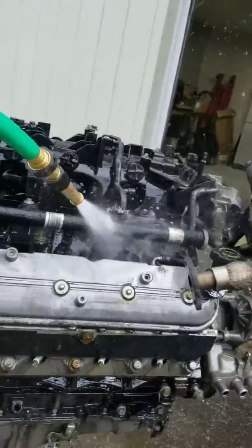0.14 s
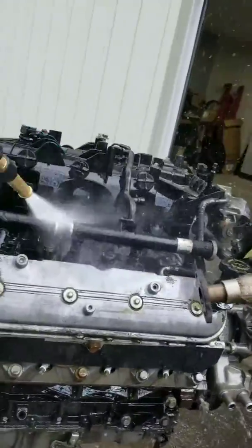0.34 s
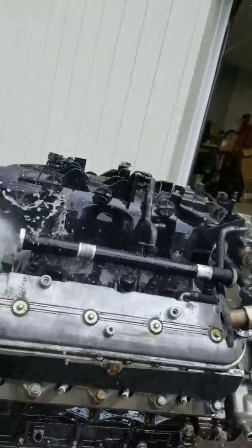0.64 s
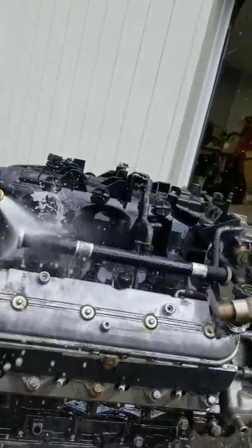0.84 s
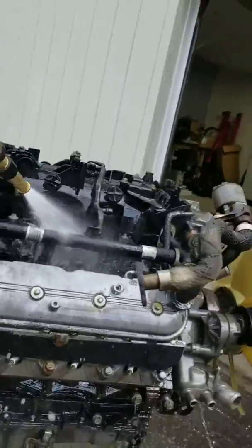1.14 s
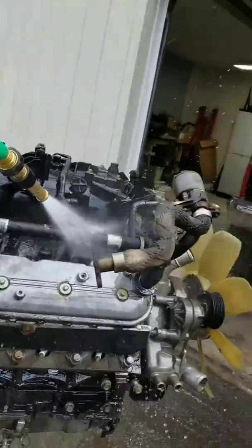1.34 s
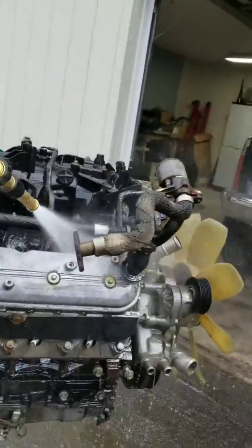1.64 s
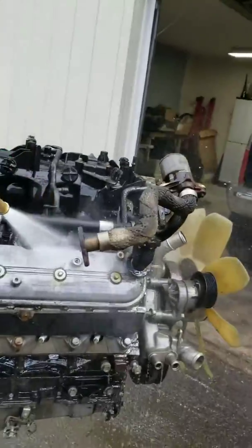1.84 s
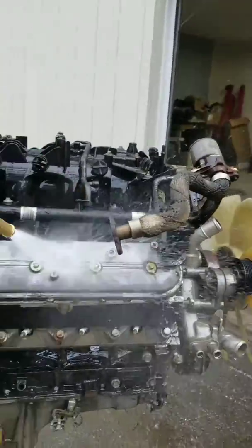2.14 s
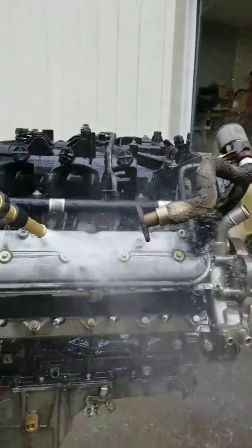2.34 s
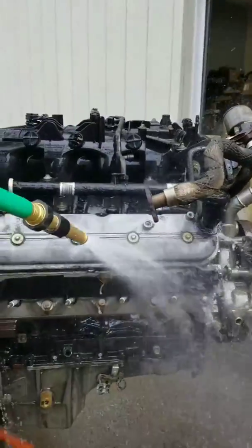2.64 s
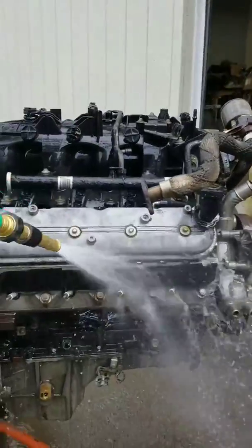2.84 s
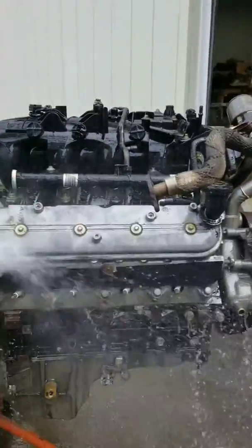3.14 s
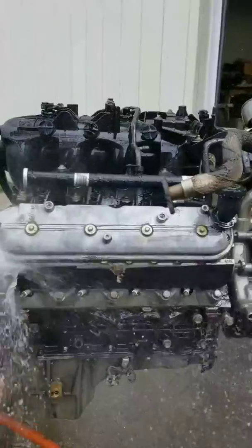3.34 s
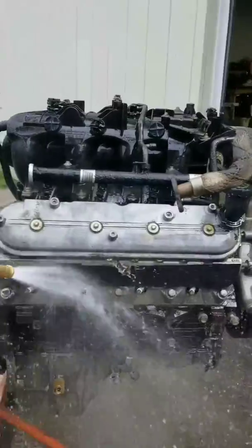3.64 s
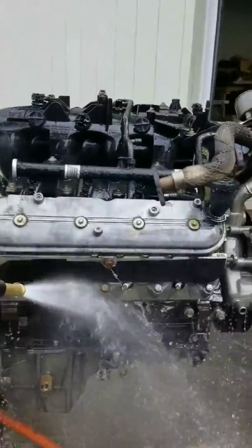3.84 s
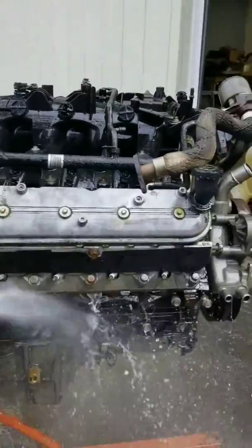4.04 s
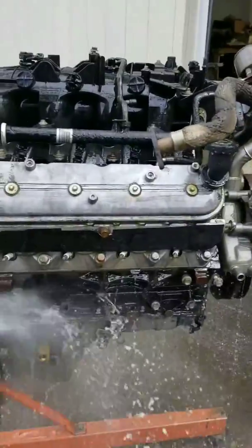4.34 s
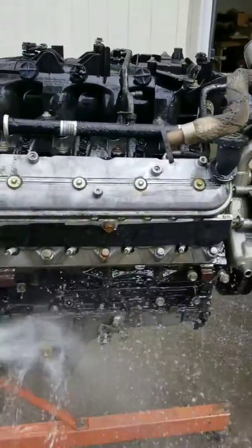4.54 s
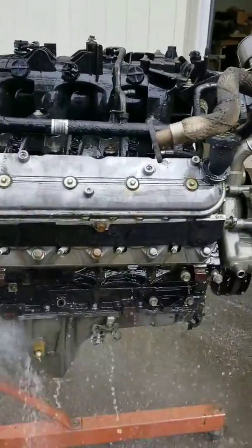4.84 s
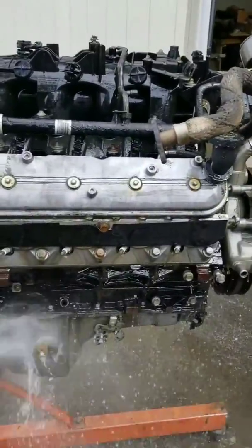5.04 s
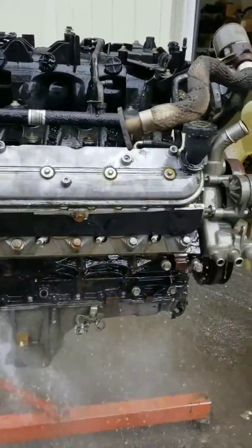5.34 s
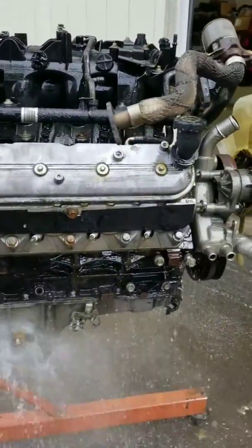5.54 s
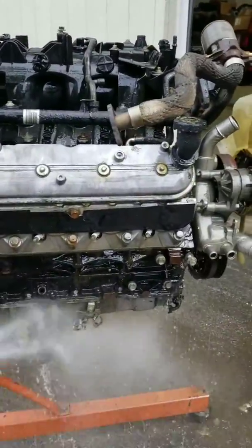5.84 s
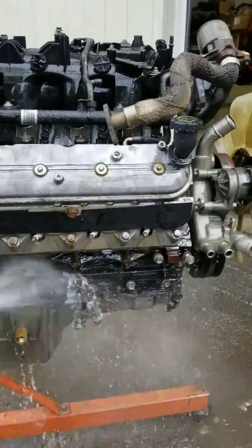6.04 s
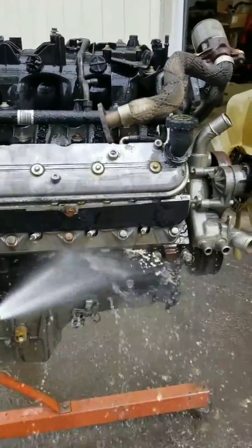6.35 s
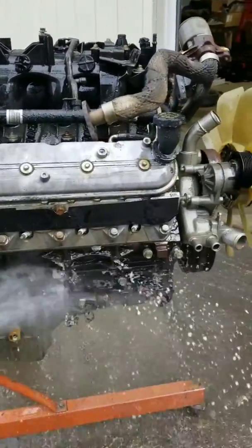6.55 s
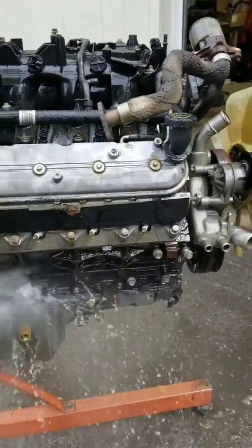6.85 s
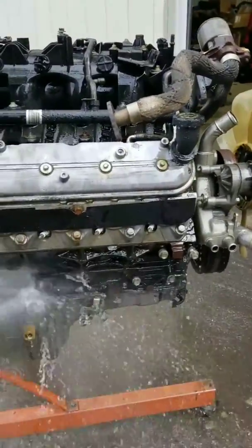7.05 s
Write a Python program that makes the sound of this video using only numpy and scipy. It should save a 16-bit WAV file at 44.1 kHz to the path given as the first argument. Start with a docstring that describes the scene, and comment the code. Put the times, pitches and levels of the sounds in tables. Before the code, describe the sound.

A hose jet sprays a metal engine block outdoors, close to the microphone and a little to the left. Its bright hiss runs for the whole seven seconds, mixed with fine splatter and sharp ticks of stray drops on metal and ground. From about 0.4 to 1.3 seconds the jet slaps and drums on the castings in quick surges. Harder hits come around 2.7 to 3 seconds, with brief hollow notes as water blows across recesses, and again from 3.6 to 3.9 seconds, ending in a few sharp drop ticks. From roughly 4.5 to 6 seconds the spray settles into a softer, misty hiss and drifts nearer the centre. It surges again from 6 to 6.7 seconds and keeps spraying to the end. Faint distant traffic rumble and a low wavering hum sit underneath, rising slightly at the close.

```python
"""Hosing down an engine block

Outdoors, close up, on a hand-held recorder with two microphone ports. Drops slap and drum on the
castings, burst into mist and blow across hollows; far traffic and a hum lie beneath. The jet lands
to the left, so it reaches the left port first, by an amount that follows the aim."""
import sys
import numpy as np
from scipy import signal
from scipy.fft import rfft, irfft, next_fast_len
from scipy.io import wavfile
from scipy.ndimage import uniform_filter1d, map_coordinates

SR = 44100
rng = np.random.default_rng(int(sys.argv[2]) if len(sys.argv) > 2 else 0)


def pcm_store(signal):
    """Save signal as 16-bit PCM."""
    levels = np.round(np.clip(np.atleast_2d(signal), -1, 1) * 32767)
    wavfile.write(sys.argv[1], SR, levels.astype(np.int16).T)


N = 317159
TIME_S = np.arange(N) / SR

# far road: time_s, rumble_db, thrum_db
ROAD_LEVELS = [(0, -45.5, -62), (.33, -49, -55), (.45, -62, -77), (.68, -60, -80), (1.05, -49.5, -67),
               (1.6, -43.5, -66), (2.5, -46.5, -51), (2.7, -48, -62), (3.25, -46.5, -54), (3.55, -51, -48),
               (3.85, -48, -58), (4.05, -47, -62), (4.2, -44, -60), (4.4, -47.5, -63), (5.3, -49, -59),
               (5.8, -48, -54), (6.3, -46, -49.5), (6.6, -44.5, -50), (7.0, -42, -50), (7.19, -38, -55)]
# its rumble and deeper thrum: frequency_hz, density_db
RUMBLE_COLOUR = [(45, -30), (70, 8.5), (100, -5.5), (145, -7.5), (210, -8), (300, -8.5), (400, -13.5),
                 (600, -69)]
THRUM_COLOUR = [(10, -33), (25, -9), (40, -7), (60, -2), (80, 8), (130, -46)]
# far hums that come and go: middle_s, length_s, level_db, pitch_hz
FAR_HUMS = [(1.82, 0.17, -49, 116.7), (2.6, 0.17, -49, 116), (3.421, 0.22, -48.5, 187.4),
            (3.8, 0.2, -42, 116), (3.85, 0.43, -46.5, 184.5), (4.15, 0.15, -42.5, 146),
            (4.27, 0.12, -43, 132), (4.8, .2, -50, 186), (5.748, .14, -47, 116.5),
            (6.026, 0.14, -50.5, 116.8), (6.254, 0.54, -51, 186), (6.6, 0.12, -43.5, 117.2),
            (6.83, .15, -45, 117.5), (7.14, 0.33, -39, 116.5)]
# how hard the run-off spatters: time_s, level_db
SPATTER_LEVELS = [(0, -44), (2.5, -44), (4.1, -37), (4.5, -42), (5.9, -40), (6.3, -46), (7.19, -43)]
# its stray drops: frequency_hz, density_db
SPATTER_COLOUR = [(1200, -39), (2500, -6), (4000, 9.5), (6000, -28), (9000, -3), (13000, -14), (16000, 1.5)]
# a recess sings a clear note: middle_s, length_s, level_db, pitch_hz
RECESS_NOTES = [(1.188, .016, -29.5, 1200), (2.795, .085, -30, 288), (2.755, .04, -36, 620),
                (2.985, .04, -31, 425), (2.99, 0.021, -32, 780)]
# the jet blows across a recess: middle_s, length_s, level_db, pitch_hz, width_ratio
BLOWN_RECESSES = [(0.105, 0.17, -42.5, 634, 0.49), (0.97, 0.029, -45, 680, .8),
                  (1.146, 0.035, -40, 610, 0.38), (1.19, 0.023, -33, 624, 0.51),
                  (1.33, 0.047, -44, 680, 0.55), (1.89, 0.43, -43, 620, 0.74),
                  (2.78, 0.092, -31.5, 292, 0.06), (2.913, 0.029, -33.5, 297, 0.054),
                  (2.985, 0.033, -32, 444, 0.26), (3.016, 0.049, -35, 440, 0.26),
                  (3.601, 0.042, -28.5, 626, 0.49), (3.688, 0.042, -30, 650, 0.5)]
# air resonances of a hollow: pitch_ratio, level_db
HOLLOW_MODES = [(1.001, 0), (2.1, -10.5), (3.3, -10)]
# single big drops: start_s, level_db, pitch_hz, tick_over_ring_db
BIG_DROPS = [(0.0126, -14, 4650, -9), (0.4576, -11, 2300, -14), (0.4684, -11, 2300, -12),
             (0.479, -7, 2500, -14), (0.508, -9, 5000, 2), (0.554, -12, 3190, -13), (0.819, -12, 3190, -13),
             (1.0944, -12, 2940, -12), (1.5175, -14, 4840, -6), (1.5787, -15, 4220, 3),
             (1.5897, -9, 4200, -12), (1.5918, -8, 4600, -12), (1.6689, -15, 4650, -8),
             (2.0123, -13, 2800, -10), (2.2767, -11, 3840, -8), (2.4588, -12, 4010, -4),
             (2.531, -16, 5080, -6), (2.924, -7, 5860, -14), (2.9771, -9, 5430, -8),
             (3.2864, -11, 4230, -6), (3.3094, -10, 3970, -6), (3.4291, -11, 4350, -8),
             (3.8692, -1, 4400, -10), (3.8772, -5, 5800, -8), (3.9055, -7, 4070, -8),
             (3.9747, -11, 4050, -6), (4.3944, -13, 4520, -6), (4.5386, -12, 3790, -5),
             (4.6283, -14, 6720, 1), (4.6064, -12, 4200, -8), (4.7014, -10, 5800, -6),
             (4.7178, -13, 6500, 0), (4.7775, -12, 4300, 1), (4.8214, -12, 4300, -8),
             (4.9294, -9, 4000, -7), (5.0389, -14, 7170, -2), (5.2611, -13, 7320, 1),
             (5.5084, -10, 4020, -8), (5.5287, -12, 4570, -4), (5.6376, -10, 6030, -1),
             (5.7954, -13, 4710, -6), (5.9624, -12, 4310, -6), (6.078, -11, 4310, -4),
             (6.8324, -10, 4210, -8), (7.1054, -7, 4600, -10), (7.1532, -9, 3530, -6)]
# the glancing spray that never stops: time_s, slap_db, drum_db, sizzle_db, mist_db
STEADY_SPRAY = [(0, -31.5, -44, -34.5, -31.5), (.28, -37.5, -42, -38.5, -34), (.75, -36.5, -53, -37.5, -35),
                (.95, -37, -48, -43, -33.5), (1.2, -38, -48, -34, -30.5), (1.7, -34.5, -42, -36.5, -32),
                (2.25, -35, -43.5, -35.5, -29.5), (2.55, -36.5, -44, -37, -30.5),
                (3.0, -33.5, -48, -35.5, -30), (3.25, -34, -45, -34, -27.5), (3.8, -30, -42, -32, -31.5),
                (4.5, -36, -41.5, -35.5, -31), (4.85, -39, -45, -35.5, -31), (4.96, -38, -45.5, -37.5, -33),
                (5.15, -39.5, -42, -34, -30.5), (5.93, -39, -44.5, -38, -30.5),
                (6.05, -32, -41.5, -37.5, -31.5), (6.4, -31, -44, -32.5, -25.5),
                (6.9, -31.5, -37.5, -32.5, -30), (7.19, -38, -45.5, -32, -29.5)]
# the jet catches a part square on: middle_s, length_s, slap_db, drum_db, sizzle_db, mist_db
SQUARE_HITS = [(0.174, 0.062, -36, -57, -32.5, -28.5), (0.396, 0.062, -32, -41, -34.5, -39),
               (0.472, 0.041, -34, -30, -48, -45), (0.518, 0.03, -37, -37, -31.5, -35),
               (0.565, 0.042, -28, -37, -39, -42), (.61, .05, -30.5, -37, -39, -40),
               (0.66, 0.042, -34.5, -35.5, -32.5, -40), (.82, 0.021, -33.5, -42, -34, -40),
               (0.868, 0.047, -36, -35.5, -32, -35), (0.97, 0.12, -30, -34.5, -34.5, -45),
               (1.123, .04, -31.5, -28, -34, -44), (1.164, 0.065, -28, -31, -30, -42),
               (1.225, .05, -36, -33, -43, -45), (1.3, 0.094, -31, -43, -41, -37),
               (2.692, 0.12, -32.5, -45, -38, -47), (2.765, 0.052, -24, -31.5, -32, -45),
               (2.823, 0.045, -26, -39, -28.5, -42), (2.89, .035, -26.5, -38, -28, -47),
               (2.925, 0.048, -24.5, -36.5, -24.5, -47), (2.985, 0.043, -25.5, -33.5, -29, -47),
               (3.082, 0.041, -32, -55, -34, -45), (3.578, 0.073, -26, -33.5, -26.5, -31),
               (3.652, 0.03, -27.5, -29, -30, -45), (3.715, 0.091, -29, -51, -26, -47),
               (3.826, 0.067, -42, -55, -26.5, -49), (3.864, 0.035, -26.5, -50, -25, -48),
               (3.902, 0.025, -30, -37, -33, -48), (4.193, 0.13, -30.5, -55, -33, -38),
               (4.407, 0.1, -32.5, -43, -35, -48), (4.702, 0.027, -44, -57, -41, -40),
               (4.85, .04, -41, -44, -35, -40), (5.144, 0.053, -41, -46, -37, -32),
               (5.256, 0.027, -49, -54, -34, -42), (5.522, 0.092, -39, -43, -40, -45),
               (6.064, 0.051, -23.5, -51, -29.5, -27), (6.127, 0.085, -26.5, -38.5, -32, -36),
               (6.266, 0.059, -28, -38.5, -34, -28.5), (6.434, 0.045, -31.5, -41, -29.5, -29),
               (6.514, 0.046, -32, -41, -35, -38), (6.576, 0.064, -23.5, -54, -36, -41),
               (6.664, 0.064, -32.5, -54, -30.5, -36), (6.71, 0.044, -37, -54, -40, -42),
               (6.83, .025, -34, -44, -38, -42), (7.072, 0.038, -29, -39, -39, -34),
               (7.108, .025, -30, -37, -39, -40), (7.157, 0.043, -30, -38.5, -36, -45)]
# the jet's four sounds: frequency_hz, density_db
SLAP_COLOUR = [(1500, -24.5), (2200, -10), (2700, 1), (3200, 0.5), (3700, -1), (4200, 1), (4650, -1.5),
               (5100, -20), (6000, -34), (9000, -39)]
DRUM_COLOUR = [(500, -25), (900, -10.5), (1200, -2.5), (1400, -3.5), (1600, -4.5), (1900, -2), (2300, -3),
               (3200, -25)]
SIZZLE_COLOUR = [(3500, -19), (4900, 1), (5700, 5.5), (6500, 1.5), (7000, -1), (7600, -4.5), (8600, -10.5),
                 (11000, -13)]
MIST_COLOUR = [(2000, -16), (6000, -6.5), (8000, -3.5), (9500, -3), (10500, -6.5), (11800, 1), (13200, -2),
               (14500, -2), (15600, -0.5)]
# what shifts each of those colours: time_s, pitch_ratio, tilt_db_per_octave
STRUCK_PART = [(0, 0.88, 2), (.42, 0.91, 7), (.56, 0.92, -8), (.68, 1.04, -8), (.9, 1.04, -12),
               (1.15, 0.96, -6), (1.35, 1.02, -5), (1.6, 1.05, -3), (2.6, 0.88, 0.5), (2.85, 1.01, -5.5),
               (3.1, 1.03, -6.5), (3.55, 0.97, -0.5), (3.9, 0.97, -4), (4.2, 1.11, -2), (4.6, 1.04, 0.5),
               (4.9, 1.04, 1), (5.2, 1.02, 4), (5.5, 1.0, 4), (5.9, 1.07, 7), (6.1, 1.15, -4),
               (6.35, 1.04, -6), (6.58, 1.05, -1.5), (6.75, 1.05, 5), (7.0, 0.97, 4), (7.09, 1.15, 5),
               (7.19, 0.97, -1)]
DRUMMED_COVER = [(0, 0.94, 2), (.5, 1.11, -2.5), (.9, .9, -4.5), (1.15, 1.1, -3), (1.6, 1.02, -1),
                 (1.9, 0.74, -6), (2.25, 0.85, 8), (2.55, 0.8, -3), (2.8, 0.84, -6), (3.0, 1.02, -5),
                 (3.6, 0.84, 0.5), (4.3, 0.82, 11), (4.9, 0.99, -0.5), (5.5, 1.08, -4.5), (6.3, 0.88, 5),
                 (7.19, 0.97, 3)]
SPLITTING_EDGES = [(0, 0.98, 8), (.7, 0.93, -6), (1.3, 1.02, -10), (2.3, 0.98, 1.5), (2.9, 0.99, -3.5),
                   (3.8, 1, -2), (4.3, 1, 4), (4.8, 1, -1.5), (5.8, 0.98, 0), (6.2, 1.01, 1.5),
                   (7.19, 0.97, 2)]
MIST_FINENESS = [(0, 0.95, 6), (.5, 0.95, -1), (1.5, 0.99, 0), (1.95, 0.95, 2), (2.35, 0.95, 7.5),
                 (2.8, 0.93, 4.5), (3.2, 1, -1), (4, 0.96, -0.5), (6, 0.99, 0.5), (6.4, 0.99, 1.5),
                 (7.19, 1, -6.5)]
# the aim, as the head start of the left port: time_s, lead_ms
JET_AIM = [(0, 0.36), (1.2, 0.3), (1.4, 0.29), (1.7, 0.31), (2.3, 0.33), (2.55, 0.36), (2.7, 0.28),
           (3, 0.28), (3.8, 0.273), (4.2, 0.22), (4.6, .18), (5, 0.17), (5.9, 0.15), (6.05, 0.2),
           (6.35, 0.25), (6.7, 0.19), (6.95, 0.19), (7.19, 0.2)]
# three bearings, nearly ahead, half left and far left: lead_ms
BEARING_LEADS = [.16, .27, .32]
# the ports' response at each bearing: frequency_hz, left_db, right_db, left_phase_rad
PORTS_AHEAD = [(100, -2, -1.5, 0), (543, -10.5, -6.5, -0.83), (736, -9.5, -1.5, -0.032),
               (1060, -6.5, -1.5, -.4), (1210, -6, -2.5, 0.05), (1480, -4.5, -6, -0.73),
               (1960, -1, -4.5, -1.1), (2640, -2, -1.5, -0.78), (2910, 0, -2, 0.59),
               (3220, -0.5, -1.5, -0.26), (3760, 0, -1, -0.8), (4270, -2.5, 1, -0.11),
               (4540, -1, 2.5, -0.12), (5100, -3, -1.5, -1.4), (5630, -4, -5.5, -0.38),
               (6360, -5.5, -1, 0.41), (7270, -4, 4.5, 1), (8400, -1.5, -5, 0.9), (9800, 2.5, 1.5, 0.56),
               (11900, -2, 2.5, -0.4), (13800, 2, 3, 0), (15300, 3, 0, 0)]
PORTS_HALF_LEFT = [(100, -5.5, -6, 0.071), (500, -9.5, -6, -1.55), (690, -9.5, 1.5, -1.3),
                   (815, -8.5, -1, 0.084), (1210, -2.5, -4, -0.11), (1450, -1.5, -6, -1.35),
                   (1730, -4.5, -2.5, -1.57), (2260, -2, -4.5, 0.044), (2660, -2.5, -5, 0.39),
                   (3480, -2.5, -3.5, -0.35), (4050, 1, 1, -0.17), (4500, -1, -6.5, 0.098),
                   (4970, 0, -4.5, 0.59), (5540, -10, 0, -0.058), (6160, -8, 2, 2.4),
                   (7330, -10, -1.5, 2.6), (8360, 2.5, -2, -0.99), (11700, -3, 1.5, -0.8),
                   (13400, 1, 5.5, -0.4), (15300, 3, -2, 0.6)]
PORTS_FAR_LEFT = [(100, -5.5, -5.5, -0.5), (447, -10, -7.5, -0.85), (720, -10, 0, -0.7),
                  (840, -9, -2.5, 0.7), (1010, -4, -5, 0), (1225, -3, -12.5, -1.4),
                  (1430, -0.5, -0.5, -2.5), (1750, -2, -2, -1), (2040, -1.5, -9.5, -1),
                  (2290, -3, -4.5, -0.1), (2650, -0.5, -3, 1.1), (3420, -2, -5, 0.5),
                  (3800, -1.5, -6, -0.45), (4200, -2, -4, -0.5), (4640, 0.5, -0.5, 0.5),
                  (5160, -3, -1.5, -0.5), (5600, -5, 0, 2), (6260, -8, -5, 0.7), (7100, -3.5, -2.5, 2),
                  (8440, 1.5, -1, -0.2), (11800, -2, 1.5, -1.5), (13500, 2.5, 2.5, -1),
                  (15300, 5.5, -3, -3)]
# how alike the ports sound: frequency_hz, far_left_likeness, ahead_likeness
PORT_LIKENESS = [(30, 1, 0.96), (100, 0.97, 0.98), (550, 0.9, .88), (750, 0.9, .72), (1000, 0.83, .72),
                 (1250, 0.68, 0.72), (1500, 0.9, 0.71), (1900, 0.77, .5), (2310, 0.66, 0.22),
                 (3100, 0.72, 0.79), (3800, 0.59, 0.28), (4270, 0.56, 0.58), (5200, 0.63, .4),
                 (7000, 0.16, 0.18), (12000, 0.093, .05)]

HUM_BELOW_DB, HUM_HZ = -9.5, 117.2  # the quiet hum under the rumble
GAP_DB, GAP_HZ, GAP_WIDTH = -46, 520, 0.95  # open gaps between parts, always sounding
SQUARENESS = 1.92  # how flat the top of a swell is
TOP_HZ = 15620


def amp(db):
    return 10 ** (np.asarray(db) / 20)


def unit_rms(x):
    return x / np.sqrt(np.mean(x ** 2) + 1e-20)


def at_frequencies(rows, hz):
    """Each column after the frequency, interpolated on a log axis."""
    knots_hz, *columns = np.transpose(rows)
    return [np.interp(np.log(hz + 1), np.log(knots_hz + 1), column) for column in columns]


def curves(rows, t=TIME_S):
    """Each column after the time, interpolated at t."""
    knots_s, *columns = np.transpose(rows)
    return [np.interp(t, knots_s, column) for column in columns]


def swells(rows, t=TIME_S):
    """A smooth rise and fall, 0 to 1, for each row that opens with middle_s and length_s."""
    middle, length = np.transpose(rows)[:2, :, None]
    return np.exp(-np.log(2) * np.abs(2 * (t - middle) / length) ** SQUARENESS)


def wobble(rate):
    """A smooth random curve, rate knots a second."""
    return map_coordinates(rng.standard_normal(int(N * rate / SR) + 4), [np.arange(N) * rate / SR])


def swelling_tones(rows, drift_cycles):
    """Sines that swell and fade in turn, sharing one waver."""
    return sum(amp(db) * swell * np.sin(2 * np.pi * (hz * TIME_S + drift_cycles))
               for (_, _, db, hz), swell in zip(rows, swells(rows)))


def reshaped(x, change):
    """x with its short-time spectrum passed through change(spectrum, hz, t)."""
    hz, t, spectrum = signal.stft(x, SR, nperseg=1024, noverlap=640)
    return signal.istft(change(spectrum, hz[:, None], t), SR, nperseg=1024, noverlap=640)[1][..., :N]


def tinted(x, colour, patchy_db, part=((0, 1, 0), (9, 1, 0)), pivot_hz=3500, still_hz=None):
    """x in a patchy colour that a part may tilt and shift (less and less up to still_hz); rms 1."""
    def tint(spectrum, hz, t):
        shift, tilt_db = curves(part, t)
        if still_hz:
            shift = shift ** np.clip(2 * np.log2(still_hz / (hz + 1)), 0, 1)
        patches = uniform_filter1d(rng.standard_normal(spectrum.shape[1:]), size=6, axis=0)
        patches = unit_rms(uniform_filter1d(patches, size=8, axis=1))
        slope_db = tilt_db * np.log2(np.clip(hz / pivot_hz, .6, 1.7))
        return spectrum * amp(at_frequencies(colour, hz / shift)[0] + slope_db + patchy_db * patches)
    return unit_rms(reshaped(x, tint))


def drops(per_s, spread_db, life_s, steady, scatter):
    """Two noises that burst together at each landing drop, over a steady share; scatter sizes the second."""
    landed = rng.random(N) < per_s / SR
    energies = landed * amp(spread_db * np.minimum(rng.exponential(size=N), 4)) ** 2
    bursts = signal.lfilter([1], [1, -np.exp(-1 / (life_s * SR))], energies)
    pair = np.sqrt(steady + bursts / bursts.mean()) * rng.standard_normal((2, N))
    pair[1] *= scatter
    return pair


def traffic():
    """Far off: road rumble, a deeper thrum, a quiet wavering hum and tones that swell now and then."""
    rumble_db, thrum_db = curves(ROAD_LEVELS)
    rumble = amp(rumble_db) * tinted(rng.standard_normal((2, N)), RUMBLE_COLOUR, patchy_db=0.2)
    thrum = amp(thrum_db) * tinted(rng.standard_normal((2, N)), THRUM_COLOUR, patchy_db=4.0)
    drift_cycles = np.cumsum(4 * wobble(12)) / SR
    hum = amp(rumble_db + HUM_BELOW_DB) * np.sin(2 * np.pi * (HUM_HZ * TIME_S + drift_cycles))
    hum += swelling_tones(FAR_HUMS, drift_cycles)
    return rumble + thrum + amp(2.2 * wobble(9)) * hum * [[1], [0]]


def spatter():
    """Stray drops tick on the nearer metal and the ground: sparse, sharp and of very unequal size."""
    ticks = drops(per_s=110, spread_db=2.5, life_s=.00025, steady=0, scatter=.6)
    return amp(curves(SPATTER_LEVELS)[0]) * tinted(ticks, SPATTER_COLOUR, patchy_db=1.5)


def recess_notes():
    """The air in a recess of the block sings short wavering tones."""
    drift_cycles = np.cumsum(20 * wobble(60)) / SR
    flutter_db = 3.1 * wobble(70)
    return amp(flutter_db) * swelling_tones(RECESS_NOTES, drift_cycles) * [[1], [.2]]


def hollows():
    """Water blown across a recess sounds its air resonance and two overtones."""
    def resonance(hz, pitch, width):
        modes = [amp(db) ** 2 / (1 + ((hz / (ratio * pitch) - ratio * pitch / (hz + 1)) / width) ** 2)
                 for ratio, db in HOLLOW_MODES]
        return sum(modes) / np.mean(modes[0])

    def resonate(spectrum, hz, t):
        gaps = amp(GAP_DB) ** 2 * resonance(hz, GAP_HZ, GAP_WIDTH)
        blown = sum(amp(db) ** 2 * swell * resonance(hz, pitch, width)
                    for (_, _, db, pitch, width), swell in zip(BLOWN_RECESSES, swells(BLOWN_RECESSES, t)))
        return spectrum * np.sqrt(gaps + blown)
    gurgle_db = 0.62 * wobble(15)
    water = drops(per_s=300, spread_db=1.0, life_s=0.004, steady=1.0, scatter=1.0)
    return amp(gurgle_db) * reshaped(unit_rms(water), resonate)


def splats():
    """Big drops land straight ahead: a sharp tick and a brief ring, with nothing in the bass."""
    track, t = np.zeros(N + SR), np.arange(400) / SR
    for start_s, db, hz, tick_db in BIG_DROPS:
        ring = amp(-60 * t / .0045) * (1 - np.exp(-t / .0002)) * np.sin(2 * np.pi * hz * t)
        tick = amp(tick_db - 60 * t / .0018) * np.cos(2 * np.pi * 11500 * t)
        track[round(start_s * SR):][:len(t)] += amp(db) * (ring + tick)
    return signal.sosfilt(signal.butter(2, 1000, "high", fs=SR, output="sos"), track[:N])


def strike_db():
    """Levels of slap, drum, sizzle and mist: the powers of steady spray and square hits add."""
    t = np.arange(0, N + 64, 64) / SR
    hit_power = amp(np.transpose(SQUARE_HITS)[2:]) ** 2 @ swells(SQUARE_HITS, t)
    power = amp(curves(STEADY_SPRAY, t)) ** 2 + hit_power
    return curves(np.vstack([t, 10 * np.log10(power)]).T)


def jet():
    """Close up, the jet slaps the castings, drums on covers, sizzles on edges and bursts into mist."""
    slap_db, drum_db, sizzle_db, mist_db = strike_db()
    # the broken core lands in slugs that shake all four sounds together
    slugs_db = .5 * wobble(20) + 0.69 * wobble(60)
    # a square hit is compact, a glancing one spreads: louder slap, less scatter between the ports
    scatter = np.clip(.9 - 0.028 * (slap_db + 22.0), .3, 1.3)
    slap = drops(per_s=1500, spread_db=3.7, life_s=0.00021, steady=3.6, scatter=scatter)
    slap = tinted(slap, SLAP_COLOUR, patchy_db=2.0, part=STRUCK_PART, still_hz=4600)
    drum = drops(per_s=470, spread_db=2.0, life_s=0.0015, steady=1.8, scatter=scatter)
    drum = tinted(drum, DRUM_COLOUR, patchy_db=2.5, part=DRUMMED_COVER, pivot_hz=1520)
    sizzle = drops(per_s=1800, spread_db=4.2, life_s=0.00021, steady=3.0, scatter=scatter)
    sizzle = tinted(sizzle, SIZZLE_COLOUR, patchy_db=1.8, part=SPLITTING_EDGES, pivot_hz=6000)
    mist = drops(per_s=3000, spread_db=1.6, life_s=.0005, steady=2.7, scatter=1.0)
    mist = tinted(mist, MIST_COLOUR, patchy_db=2.0, part=MIST_FINENESS, pivot_hz=13200)
    return (amp(slap_db + slugs_db) * slap + amp(drum_db + 0.23 * slugs_db) * drum
            + amp(sizzle_db + slugs_db) * sizzle + amp(mist_db + 0.84 * slugs_db) * mist)


def microphone_ports(pair):
    """The ports share the first signal and differ by the second; the body shades and delays them."""
    def pick_up(spectrum, hz, t):
        lead_ms = curves(JET_AIM, t)[0]
        weights = [np.interp(lead_ms, BEARING_LEADS, bearing) for bearing in np.eye(3)]
        responses = [np.array(at_frequencies(rows, hz))
                     for rows in (PORTS_AHEAD, PORTS_HALF_LEFT, PORTS_FAR_LEFT)]
        left_db, right_db, phase_rad = sum(w * response for w, response in zip(weights, responses))
        half_lead = np.exp(.5j * (2 * np.pi * hz * lead_ms / 1000 + phase_rad))
        far_left, ahead = at_frequencies(PORT_LIKENESS, hz)
        likeness = np.clip(far_left + weights[0] * (ahead - far_left), 0, 1)
        mix_rad = np.arccos(likeness) / 2
        common, apart = np.cos(mix_rad) * spectrum[0], np.sin(mix_rad) * spectrum[1]
        return np.array([(common + apart) * half_lead * amp(left_db),
                         (common - apart) / half_lead * amp(right_db)])
    return reshaped(pair, pick_up)


def scene():
    """Wide spray close to the microphones, spatter around it and the road far behind."""
    spray = np.sqrt(2) * (jet() + hollows() + recess_notes())
    return microphone_ports(spray + spatter() + traffic()) + amp([[-5], [-6]]) * splats()


def record(dry):
    """The recorder keeps nothing above its band limit."""
    size = next_fast_len(N)
    in_band = np.fft.rfftfreq(size, 1 / SR) < TOP_HZ
    return irfft(rfft(dry, size) * in_band, size)[:, :N]


dry = scene()
out = record(dry)
pcm_store(out)
```